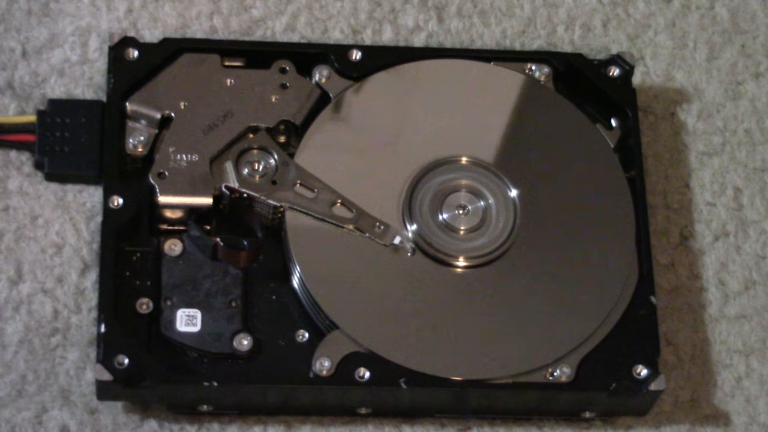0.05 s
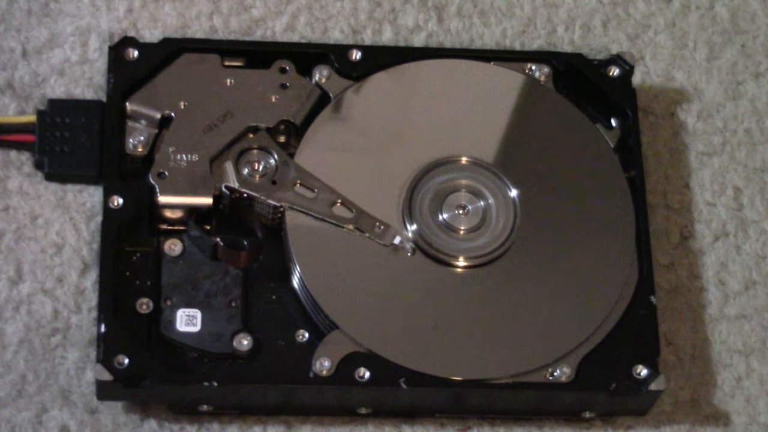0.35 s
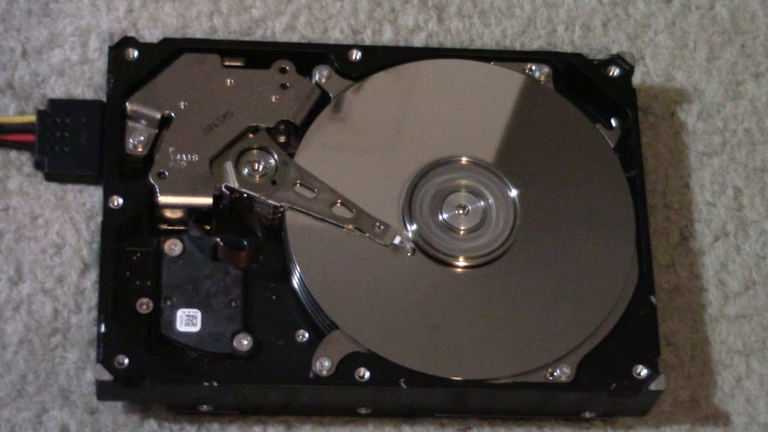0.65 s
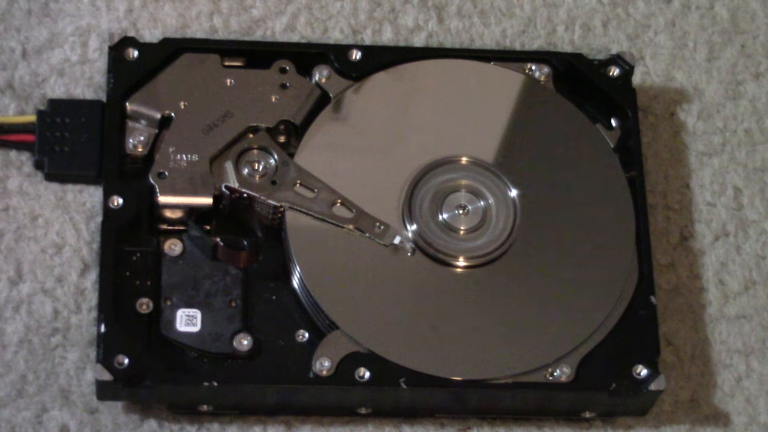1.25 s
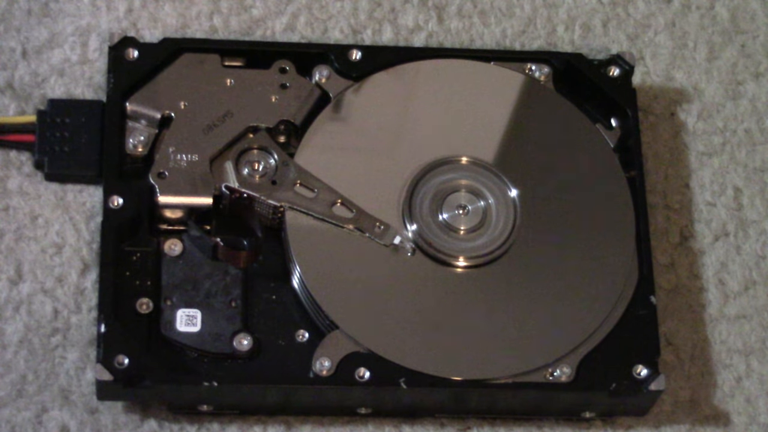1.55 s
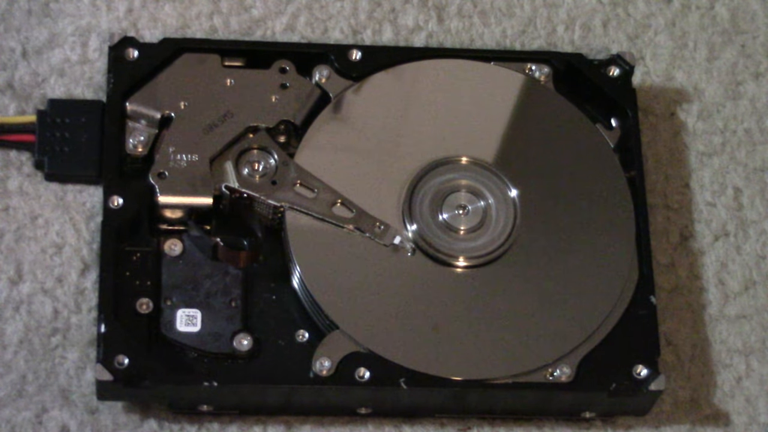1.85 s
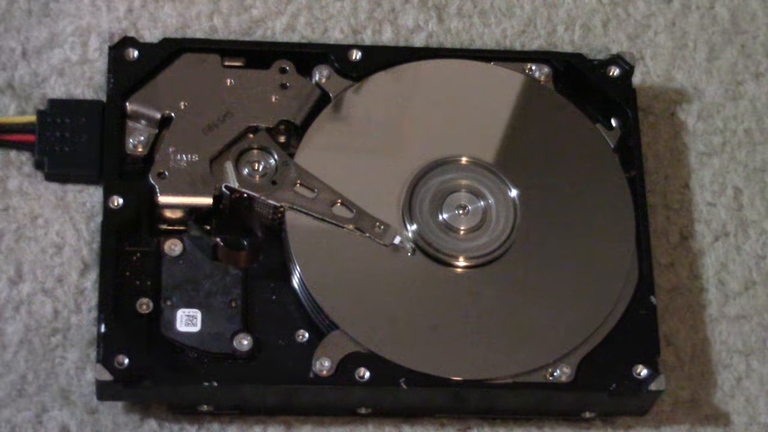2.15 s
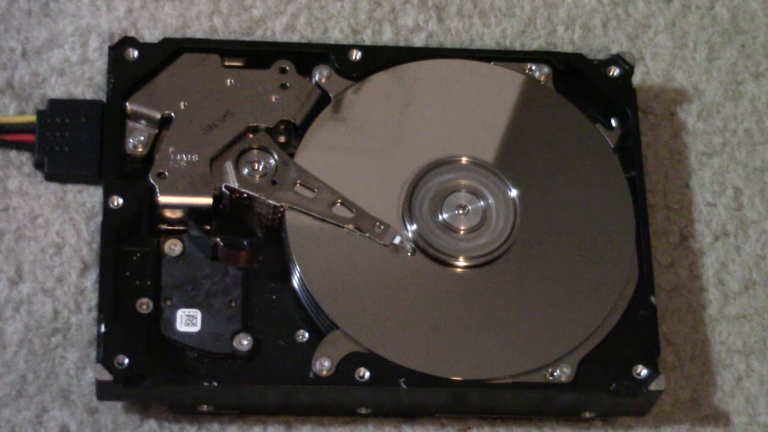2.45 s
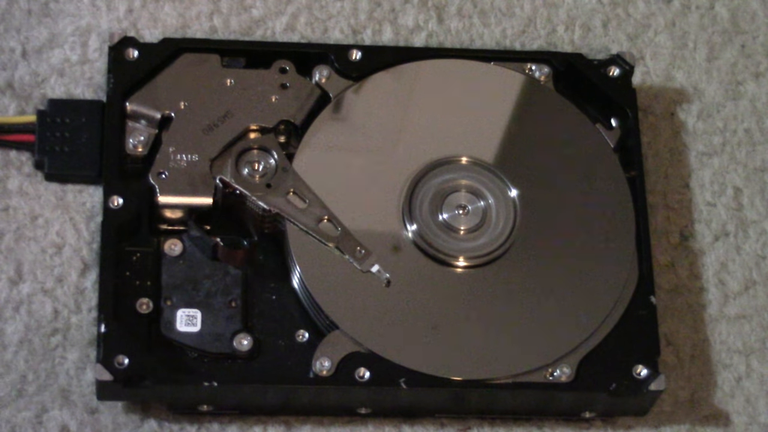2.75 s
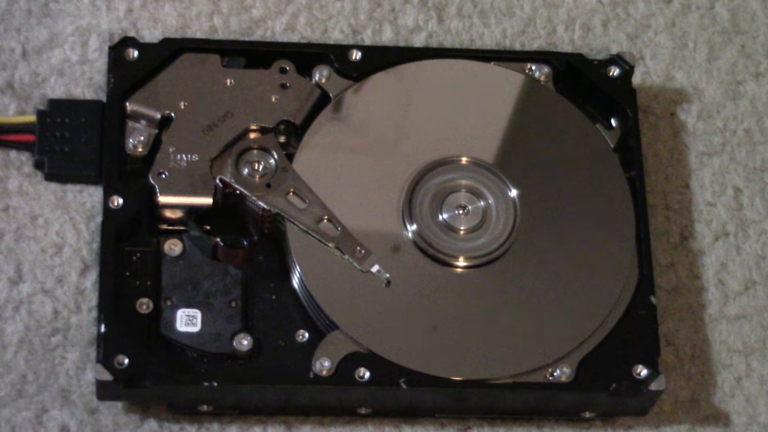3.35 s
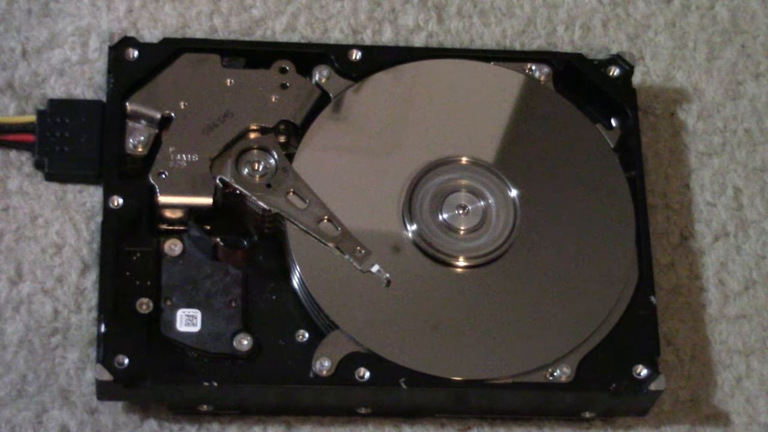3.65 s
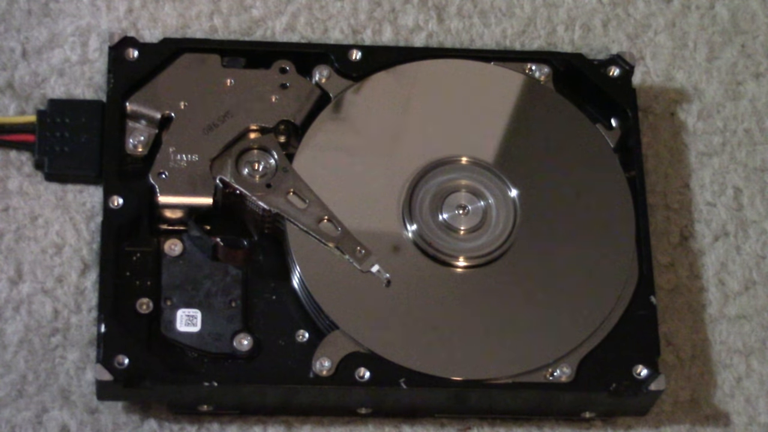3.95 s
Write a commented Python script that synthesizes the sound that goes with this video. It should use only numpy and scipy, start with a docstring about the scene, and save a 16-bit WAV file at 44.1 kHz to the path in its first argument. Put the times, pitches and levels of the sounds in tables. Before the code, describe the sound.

Close to the microphone indoors, a failing hard drive whirs steadily, giving one brief buzz as its whine dips. The whine cuts out, the arm clicks, and a much louder, rapidly stuttering metallic squeal and scraping take over.

```python
"""On a carpet, a stereo pair of microphones close above an opened, spinning hard drive.
Air whirs round the platters and the motor whines, sagging briefly once. The motor drive drops out
with a few clicks as the head arm swings out over the coasting disk. The head then stutters on the
platter, loudest of all: each contact scrapes harshly and sets off a squeal near 2 kHz."""
import sys
import numpy as np
from scipy import signal
from scipy.fft import rfft, irfft
from scipy.io import wavfile

SR = 44100
rng = np.random.default_rng(int(sys.argv[2]) if len(sys.argv) > 2 else 0)


def bounce(signal):
    """Save signal as a 16-bit WAV file at the path given by the first command-line argument."""
    frames = np.transpose(np.atleast_2d(signal))
    limited = np.clip(frames, -1, 1)
    pcm = np.round(limited * 32767).astype(np.int16)
    wavfile.write(sys.argv[1], SR, pcm)


N = 176400
TIME, BIN_HZ = np.arange(N) / SR, np.fft.rfftfreq(N, 1 / SR)


def amp(db):
    """Decibels to gain."""
    return 10 ** (np.asarray(db) / 20)


def unit(x):
    """Scales to rms 1."""
    return x / np.sqrt(np.mean(x ** 2) + 1e-20)


def spectrum(points):
    """Gain per FFT bin from points of f/Hz, level/dB."""
    hz, db = np.transpose(points)
    return amp(np.interp(np.log(BIN_HZ + 1), np.log(hz), db))


def shaped(x, gain):
    """Filters x by a gain per FFT bin, to rms 1."""
    return unit(irfft(rfft(x) * gain, N))


def noise():
    """White noise."""
    return rng.standard_normal(N)


def wobble(hz):
    """Random motion slower than about hz, rms 1."""
    return shaped(noise(), np.exp(-(BIN_HZ / hz) ** 2))


def resonate(x, hz, width):
    """One ringing mode, rms 1."""
    pole = np.exp((2j * np.pi * hz - np.pi * width) / SR)
    return unit(signal.lfilter([1, 0, -1], np.poly([pole, pole.conjugate()]).real, x))


def stroke(start, length, attack_s, release_s):
    """Envelope that rises, holds for the length and dies away."""
    live = slice(int(start * SR), int((start + length) * SR) + SR // 16)
    age = np.maximum(TIME[live] - start, 0)
    out = np.zeros(N)
    out[live] = (1 - np.exp(-age / attack_s)) * np.exp(-np.maximum(age - length, 0) / release_s)
    return out


# Contacts of head and platter: t/s, length/s, relative squeal level/dB, relative scrape level/dB
HEAD_CONTACTS = [(2.861, 0.021, -12.6, -26.6), (2.888, 0.013, -18.1, -24.4), (2.905, 0.012, -13.2, -23.6),
                 (2.922, 0.013, -15.7, -24.0), (2.941, 0.012, -12.8, -24.7), (2.957, 0.028, -15.6, -24.0),
                 (2.989, 0.015, -16.4, -21.8), (3.01, 0.013, -14.8, -24.7), (3.028, 0.012, -15.7, -23.7),
                 (3.043, 0.015, -16.6, -24.6), (3.064, 0.014, -14.8, -24.9), (3.081, 0.011, -15.5, -25.5),
                 (3.095, 0.015, -13.1, -26.5), (3.113, 0.013, -13.2, -25.0), (3.132, 0.027, -15.5, -23.9),
                 (3.171, 0.022, -18.5, -23.0), (3.196, 0.015, -15.5, -24.2), (3.217, 0.012, -17.9, -24.0),
                 (3.238, 0.009, -13.8, -25.9), (3.251, 0.013, -15.7, -23.2), (3.27, 0.025, -14.3, -24.0),
                 (3.299, 0.015, -13.6, -27.3), (3.317, 0.013, -15.1, -24.1), (3.333, 0.01, -16.8, -23.5),
                 (3.347, 0.026, -16.9, -23.8), (3.379, 0.016, -15.8, -23.6), (3.398, 0.01, -15.6, -25.8),
                 (3.414, 0.015, -15.9, -23.7), (3.432, 0.011, -15.3, -25.5), (3.449, 0.012, -14.4, -26.5),
                 (3.467, 0.013, -15.6, -23.7), (3.485, 0.011, -13.5, -23.0), (3.501, 0.01, -15.1, -24.0),
                 (3.517, 0.009, -19.7, -23.9), (3.536, 0.014, -11.7, -26.3), (3.559, 0.011, -12.0, -24.2),
                 (3.573, 0.02, -14.4, -25.8), (3.596, 0.019, -8.8, -24.5), (3.62, 0.014, -10.8, -26.2),
                 (3.637, 0.027, -13.6, -23.6), (3.667, 0.039, -42, -22.9), (3.765, 0.007, -13.1, -27.4),
                 (3.778, 0.01, -12.3, -25.5), (3.794, 0.017, -10.1, -26.3), (3.817, 0.01, -12.6, -23.3),
                 (3.831, 0.013, -13.1, -24.0), (3.847, 0.016, -13.2, -25.1), (3.869, 0.027, -13.7, -23.7),
                 (3.899, 0.009, -15.3, -23.9), (3.911, 0.014, -11.9, -25.5), (3.93, 0.027, -10.3, -23.8),
                 (3.961, 0.014, -12.0, -24.4), (3.978, 0.01, -12.3, -22.9), (3.993, 0.012, -10.2, -24.9)]


def head(grit_db=0):
    """The head stutters on the platter: each contact starts a squeal that sags as the scrape holds."""
    swing, rub = np.zeros(N), np.zeros(N)
    for start, length, squeal_db, scrape_db in HEAD_CONTACTS:
        sagging_db = squeal_db + np.interp(TIME - start, [0, 0.015], [2.6, -0.9])
        squeal_gate = stroke(start, length, attack_s=0.0016, release_s=0.0055)
        scrape_gate = stroke(start, length, attack_s=0.0019, release_s=0.0022)
        swing = np.maximum(swing, amp(sagging_db) * squeal_gate)
        rub = np.maximum(rub, amp(scrape_db + 1) * scrape_gate)
    faint_singing = amp(-33.5) * np.interp(TIME, [2.76, 2.87], [0, 1])  # lasts between contacts
    tone, phase = squeal(np.maximum(swing, faint_singing))
    slips = 1 + 0.29 * np.cos(phase)  # one slip per squeal cycle
    slips *= amp(grit_db * wobble(hz=900))  # at 0 dB all slips are equally strong
    return tone + scrape(rub, slips) + ringing(rub, slips)


# Pitch of the squeal: t/s, f/Hz
SQUEAL_PITCH = [(2.86, 1967), (3.15, 1963), (3.5, 1963), (3.56, 1984), (3.65, 1974), (3.78, 1984),
                (4, 1973)]


def squeal(swing):
    """The rubbing head sings a rough, drifting tone with a faint octave; returns tone and phase."""
    phase = 2 * np.pi * np.cumsum(np.interp(TIME, *np.transpose(SQUEAL_PITCH))) / SR
    phase += 0.13 * wobble(hz=90) + 0.95 * wobble(hz=10.7)  # jitter and slow drift
    roughness = 1 + 0.13 * wobble(hz=164)
    tone = np.sin(phase) + amp(-38) * np.sin(2 * phase)
    return np.sqrt(2) * swing * roughness * tone, phase


# Spectrum of the head scraping the platter: f/Hz, relative level/dB
SCRAPE_SPECTRUM = [(200, -50), (800, -39), (1100, -38), (1380, 9.5), (1650, -9), (1850, 6), (2300, 10),
                   (2800, 4.5), (3600, 5), (3950, 13.5), (4060, -45), (4350, 0), (4520, 7.5), (4900, 9.5),
                   (5500, 4.5), (6250, 6.5), (6450, -33), (7000, -25), (8000, -26), (8900, -6.5),
                   (9600, -3), (10400, -11), (11300, -17), (11900, -2.5), (12700, -28), (13800, -22),
                   (14800, -15), (15600, -33)]


def scrape(rub, slips):
    """Harsh friction noise while the head touches, pulsing with each slip."""
    return rub * shaped(noise() * slips, spectrum(SCRAPE_SPECTRUM))


# Spectrum of the friction force: f/Hz, relative level/dB
FRICTION_SPECTRUM = [(900, -25), (1500, 0), (12300, 0), (13300, -15)]
# Modes of platter and arm: f/Hz, width/Hz, relative level/dB
METAL_MODES = [(1966, 60, -8), (2077, 18, 0), (2212, 28, -7), (2473, 30, -13), (3121, 25, -12),
               (3330, 60, -11), (3496, 25, -14), (3878, 50, -7), (4582, 40, -13), (4738, 25, -11),
               (4922, 70, -7), (5268, 70, -10), (5720, 25, -11), (6116, 55, -12), (6270, 50, -13),
               (6600, 80, -20), (6950, 50, -24), (7280, 70, -21), (9170, 100, -18), (9640, 130, -15),
               (10400, 200, -20), (11900, 160, -18)]


def ringing(rub, slips):
    """Friction sets platter and arm ringing under the scrape."""
    friction = rub * shaped(noise() * slips, spectrum(FRICTION_SPECTRUM))
    modes = sum(amp(db) * resonate(friction, hz, width) for hz, width, db in METAL_MODES)
    return amp(-5) * np.std(rub) * modes


# Response of the arm's metal body: f/Hz, relative level/dB
ARM_BODY = [(30, -86), (600, -18), (1400, 6), (2700, 5), (3200, 9), (3900, 3), (6000, 6.5), (6900, 0),
            (7400, -2), (8000, 3), (8500, -4.5), (9100, 1), (10500, -11), (15500, -11)]
# Knocks of the arm: t/s, level/dB, tilt/(dB per octave), 60 dB decay time/s
ARM_KNOCKS = [(2.6605, -21.5, -1.5, .035), (2.679, -18, 2, .032), (2.7155, -29, -2, .05)]


def arm_clicks():
    """The arm is let go and knocks: short bursts in its metal body, dead centre."""
    out = np.zeros(N)
    octaves = np.log2(np.maximum(BIN_HZ, 600))  # the tilt starts at 600 Hz
    for start, db, tilt_db, t60 in ARM_KNOCKS:
        body = shaped(noise(), spectrum(ARM_BODY) * amp(tilt_db * octaves))
        out += amp(db) * body * stroke(start, 0.00033, attack_s=0.00052, release_s=t60 / np.log(1000))
    return out


# Speed of the platters: t/s, rotation f/Hz
PLATTER_SPEED = [(0, 120.03), (1.43, 120.03), (1.82, 117.6), (2.21, 120.0), (2.66, 119.9), (4, 117)]


def rotation():
    """Angle of the platters in radians: they spin, sag once, recover and at last coast."""
    return 2 * np.pi * np.cumsum(np.interp(TIME, *np.transpose(PLATTER_SPEED))) / SR


# Spectrum of the air round the platters: f/Hz, relative level/dB
AIR_SPECTRUM = [(25, -48), (45, -33), (62, -20.5), (80, -23.5), (110, -17), (170, -16), (240, -15),
                (420, -15), (590, -11), (780, -13.5), (1080, -9), (1350, -1), (1680, 3), (2300, -5),
                (2680, -2), (3900, -7), (4750, -6), (5500, -12.5), (6700, -17), (7500, -12), (8700, -10.5),
                (9400, -18), (11000, -16), (12300, -21), (13800, -33), (14800, -32), (15600, -34)]
# Its width across the microphones: f/Hz, side minus mid level/dB
AIR_WIDTH = [(40, -7), (120, -5), (300, -5), (700, -11), (1500, -47.5), (5000, -44), (14000, -25)]


def whir():
    """Air dragged round by the platters, throbbing with each turn; wide only in the bass."""
    throb = 1 + 0.033 * np.cos(rotation())
    fluttering_air = noise() * throb * amp(0.5 * wobble(hz=60))
    mid = shaped(fluttering_air, spectrum(AIR_SPECTRUM))
    side_air = shaped(noise(), spectrum(AIR_SPECTRUM))
    side = irfft(rfft(side_air) * spectrum(AIR_WIDTH), N)
    return amp(-34) * np.array([mid + side, mid - side])


# Partials of the motor: order of the rotation, level/dB before the sag, level/dB after it
MOTOR_ORDERS = [(53, -63.2, -64.0), (54, -60.6, -60.3), (56, -67.3, -63.3), (58, -62.9, -63.3),
                (59, -63.2, -66.8), (60, -60.1, -66.0), (61, -51.4, -58.7), (64, -63.2, -69.2),
                (65, -61.7, -60.9), (68, -66.2, -62.1), (69, -80.0, -63.4), (76, -71.6, -59.9),
                (77, -60.0, -64.9), (78, -58.8, -64.8), (80, -59.2, -61.6), (81, -63.4, -66.2),
                (82, -62.6, -66.7), (85, -60.9, -66.6), (86, -56.7, -55.8), (87, -60.4, -56.8),
                (88, -69.5, -59.4), (93, -63.2, -57.5), (101, -63.1, -68.1), (119, -67.2, -64.1),
                (120, -70.6, -67.3), (121, -59.6, -57.2), (122, -56.8, -59.7), (123, -61.6, -64.2),
                (124, -65.7, -66.5), (125, -55.9, -55.4), (126, -58.1, -61.5), (127, -66.7, -67.7)]
# Hiss of the running motor: f/Hz, relative level/dB
MOTOR_HISS = [(3000, -13.5), (5500, 1), (8000, -6.5), (10500, -2.5), (12500, -5), (13800, -14), (14900, -5),
              (15600, -12)]


def motor(drive_off_s=2.656):
    """The motor whines at high orders of the rotation and hisses, until its drive drops out."""
    angle, whine = rotation(), np.zeros(N)
    for order, early_db, late_db in MOTOR_ORDERS:
        gain = np.sqrt(2) * amp(np.interp(TIME, [1.45, 2.2], [early_db, late_db]))
        partial = np.cos(order * angle + 2 * np.pi * rng.random())
        whine += gain * partial * (1 + 0.12 * wobble(hz=6.8))
    pulsing = 1 + 0.6 * np.cos(3 * angle)
    hiss = amp(-49) * shaped(noise() * pulsing, spectrum(MOTOR_HISS))
    powered = np.clip((drive_off_s - TIME) / 0.0026, 0, 1)
    return powered * (whine + hiss)


# Outline of the buzz's harmonics: f/Hz, relative level/dB
BUZZ_SPECTRUM = [(600, -25), (1220, 3.5), (2400, 4), (3050, 1), (3700, 0), (4900, 2), (6100, 2),
                 (6700, -12), (7300, 0), (8500, -8), (10300, -4), (12000, -20)]


def rasp(at_s=1.443, width_s=0.01, pitch_hz=610.6):
    """A short pitched buzz as the motor begins to slow."""
    swell = np.exp(-0.5 * ((TIME - at_s) / width_s) ** 2)
    buzz = np.zeros(N)
    for hz in np.arange(pitch_hz, 12000, pitch_hz):
        db = np.interp(hz, *np.transpose(BUZZ_SPECTRUM))
        buzz += amp(db) * np.cos(2 * np.pi * (hz * TIME + rng.random()))
    return amp(-31) * swell * unit(buzz)


def whistle(at_s=1.83, width_s=0.063, order=61):
    """One order of the motor sings out at the bottom of the sag."""
    swell = np.exp(-0.5 * ((TIME - at_s) / width_s) ** 2)
    return np.sqrt(2) * amp(-47) * swell * np.cos(order * rotation())


# Tones of the low hum: f/Hz, level/dB
HUM_TONES = [(118.4, -64.5), (242.2, -62.5)]


def hum():
    """A faint, wavering hum lies under everything and outlasts the motor drive."""
    return sum(amp(db) * np.cos(2 * np.pi * hz * TIME) * (1 + 0.38 * wobble(hz=8.4))
               for hz, db in HUM_TONES)


def scene(head_lag_s=2e-6):
    """The drive from close above; the head reaches the left microphone a little louder and earlier."""
    left = head()
    right = irfft(rfft(left) * np.exp(-2j * np.pi * BIN_HZ * head_lag_s), N)
    head_pair = np.array([amp(0.5) * left, amp(-0.5) * right])
    return head_pair + whir() + motor() + hum() + whistle() + rasp() + arm_clicks()


def record(dry, low_cut_hz=45, band_limit_hz=15750):
    """Low cut of the microphones and band limit of the recorder."""
    low_cut = signal.butter(4, low_cut_hz, "highpass", fs=SR, output="sos")
    band_limit = signal.firwin(511, band_limit_hz, window=("kaiser", 9), fs=SR)
    return signal.oaconvolve(signal.sosfilt(low_cut, dry), band_limit[None], "same")


dry = scene()
out = record(dry)
bounce(out)
```